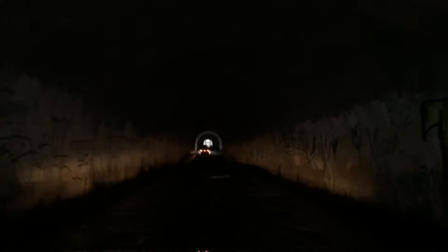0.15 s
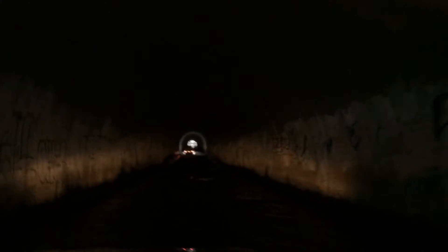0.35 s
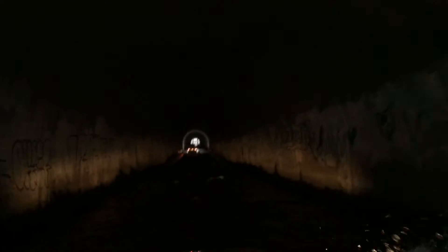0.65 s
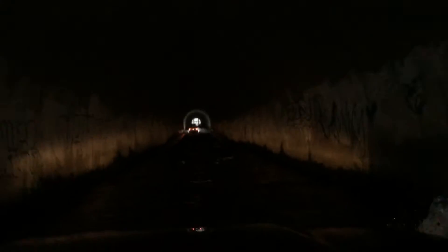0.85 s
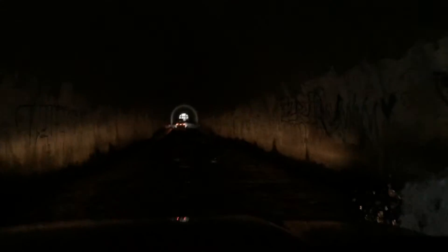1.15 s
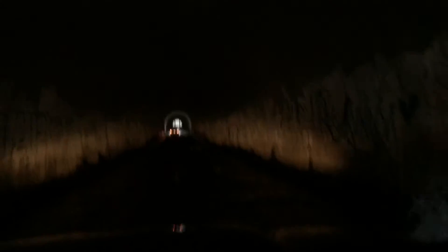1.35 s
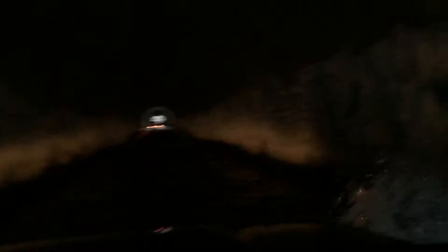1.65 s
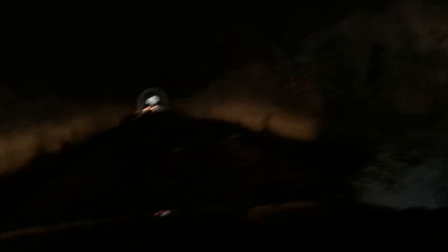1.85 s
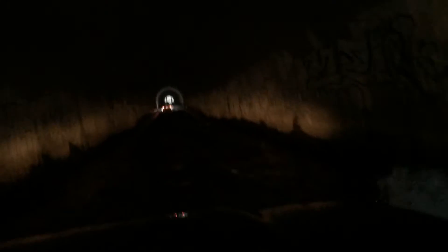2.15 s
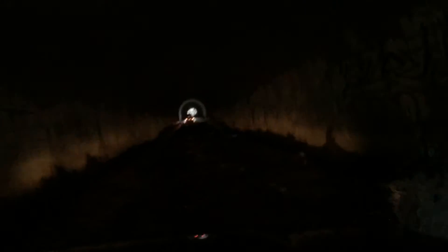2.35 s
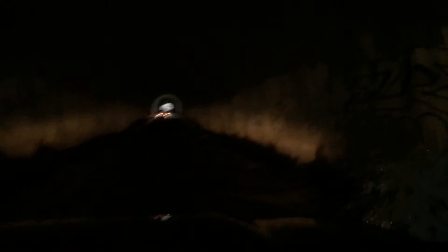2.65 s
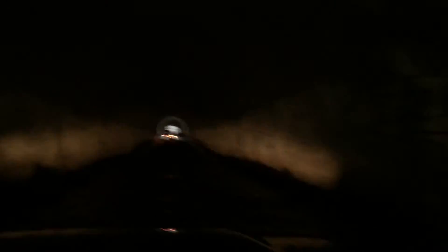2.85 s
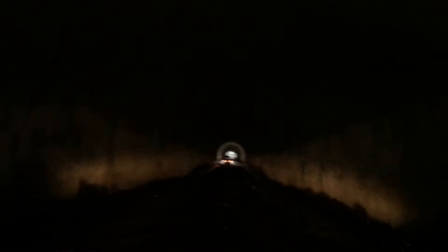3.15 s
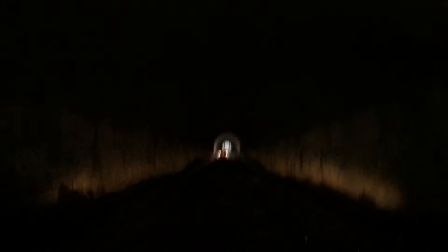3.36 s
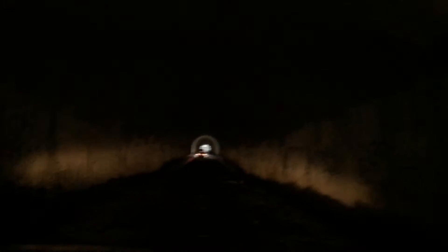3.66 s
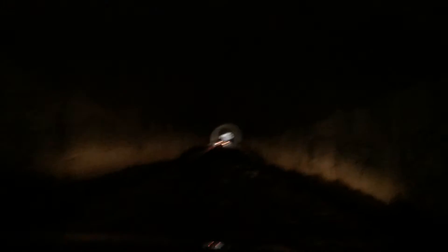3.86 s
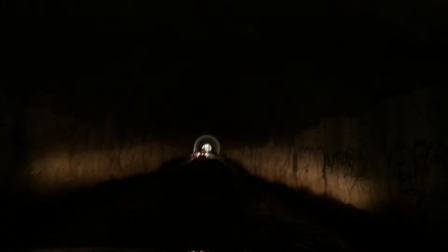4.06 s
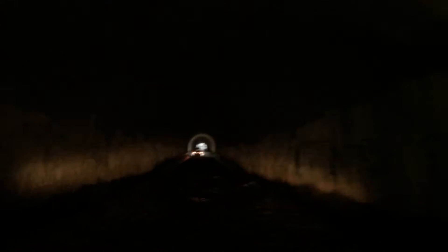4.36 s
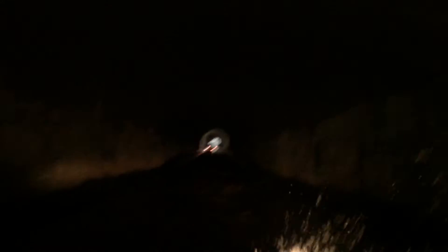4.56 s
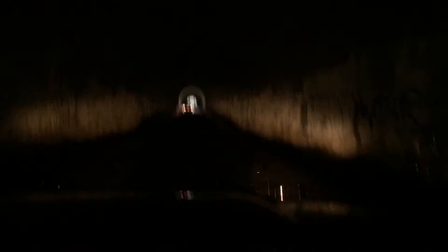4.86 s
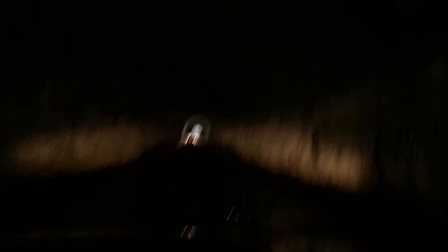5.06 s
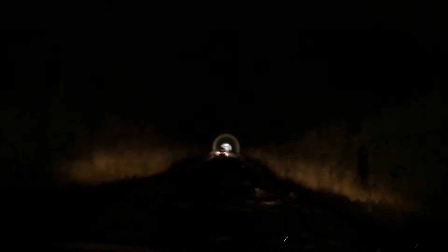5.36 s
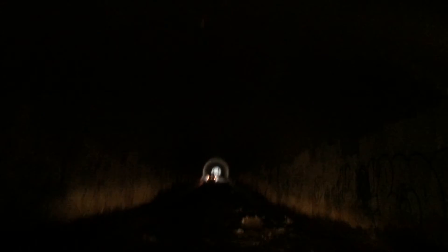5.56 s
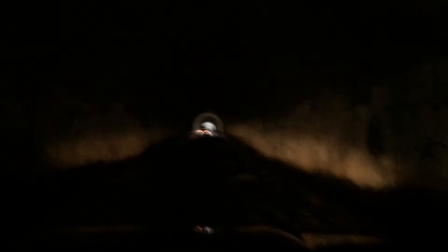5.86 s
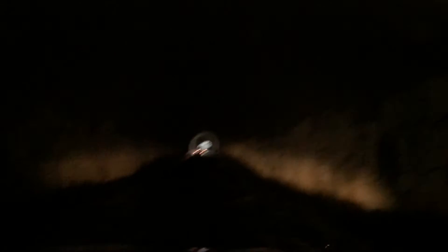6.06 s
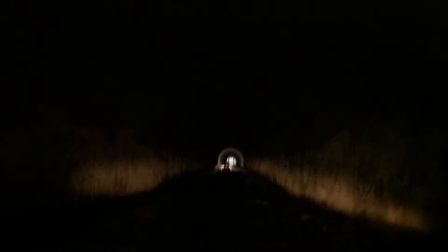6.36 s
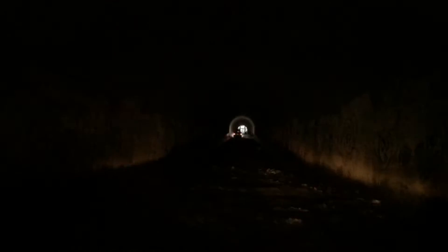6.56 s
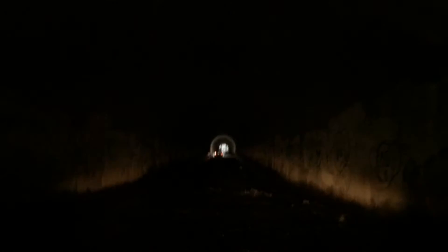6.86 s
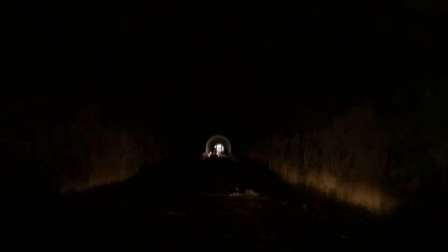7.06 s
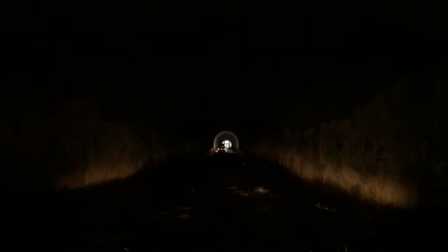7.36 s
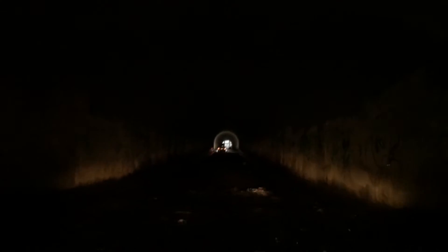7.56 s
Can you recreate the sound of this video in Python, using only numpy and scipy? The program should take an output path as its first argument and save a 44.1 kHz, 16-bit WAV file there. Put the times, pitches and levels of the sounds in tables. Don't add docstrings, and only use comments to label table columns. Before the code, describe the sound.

A low engine drone fills a car cabin with broad tyre rush on rough ground and a faint steady hum from a vehicle ahead in the tunnel. Low thumps come irregularly, with body panels droning. Around four seconds the revs dip and rise with tiny clicks of stones; later heavy bumps knock, one last stone rattles, more thuds follow and the treble fades.

```python
import sys
import numpy as np
from scipy import signal
from scipy.fft import rfft, irfft, next_fast_len
from scipy.io import wavfile
from scipy.ndimage import uniform_filter1d, minimum_filter1d, map_coordinates

SR = 44100
rng = np.random.default_rng(int(sys.argv[2]) if len(sys.argv) > 2 else 0)


def log_audio(samples):
    frames = np.atleast_2d(samples).T
    limited = np.clip(frames, -1, 1)
    pcm = np.round(limited * 32767).astype(np.int16)
    wavfile.write(sys.argv[1], SR, pcm)


def decibels_to_gain(level_db):
    exponent = np.asarray(level_db, float) / 20
    return 10 ** exponent


N = 340532
TIME_S = np.arange(N) / SR
STEP = 100

# time in seconds, level in dB.
TYRE_LEVEL = [(0, -33.5), (.7, -36.5), (.95, -35), (1.4, -36), (1.65, -34), (2.3, -32.5), (3.09, -32.5),
              (3.31, -36.5), (3.61, -34), (4.02, -35.5), (4.67, -31.5), (4.94, -35.5), (5.29, -34.5),
              (5.48, -31.5), (5.87, -34), (6.35, -31), (7.28, -30.5), (7.42, -34)]


def unit(x):
    return x / np.sqrt(np.mean(x ** 2) + 1e-20)


def curves(rows):
    s, *columns = np.transpose(rows)
    return [np.interp(TIME_S, s, column) for column in columns]


def wobble(rate_hz):
    knots = rng.standard_normal(int(N * rate_hz / SR) + 4)
    return map_coordinates(knots, [np.arange(N) * rate_hz / SR])


def fine(coarse):
    return np.interp(np.arange(N), np.arange(0, N, STEP), coarse)


def bells(rows):
    middle_s, length_s, value = np.transpose(rows)[..., None]
    coarse_s = np.arange(0, N, STEP) / SR
    return np.exp(-abs(2 * (coarse_s - middle_s) / length_s) ** 3), value


def lifted(rows, rest_db):
    bell, db = bells(rows)
    return fine(np.sqrt(decibels_to_gain(rest_db) ** 2 + np.sum((bell * decibels_to_gain(db)) ** 2, 0)))


def extra_db(rows):
    bell, db = bells(rows)
    return fine(np.sum(bell * db, 0))


def rush(spectrum, patchy_db):
    z = signal.stft(rng.standard_normal(N), nperseg=512)[2]
    patches = uniform_filter1d(rng.standard_normal(z.shape), size=8, axis=0)
    patches = unit(uniform_filter1d(patches, size=10, axis=1))
    x = signal.istft(z * decibels_to_gain(patchy_db * patches), nperseg=512)[1][:N]
    m = next_fast_len(N + 8192)
    hz, db = np.transpose(spectrum)
    log_hz = np.log(np.fft.rfftfreq(m, 1 / SR) + 1)
    gain = decibels_to_gain(np.interp(log_hz, np.log(hz + 1), db, -120, -120))
    return unit(irfft(rfft(x, m) * gain, m)[:N])


def tone(hz, drift_rad):
    phase = 2 * np.pi * np.cumsum(hz) / SR + drift_rad * wobble(12)
    return np.sqrt(2) * np.sin(phase + rng.uniform(0, 2 * np.pi))


def knocks(rows, rise_cycles):
    out, t = np.zeros(N + SR), np.arange(SR // 3) / SR
    for s, db, hz, t60_s in rows:
        decay = decibels_to_gain(db - 60 * t / t60_s)
        rise = 1 - np.exp(-(t * hz / rise_cycles) ** 2)
        out[round(s * SR):][:len(t)] += decay * rise * np.sin(2 * np.pi * hz * t)
    return out[:N]


def engine():
    # time in seconds, crank speed in Hz.
    crank_rows = [(0, 32.97), (.5, 33.54), (.75, 36.97), (1.3, 36.9), (1.8, 38), (2.2, 38.58), (3.0, 38.3),
                  (3.4, 36.46), (3.75, 34.9), (3.95, 36.3), (4.1, 41.86), (4.35, 44.1), (4.85, 45),
                  (5.6, 44.74), (6.1, 44.1), (7.1, 45), (7.72, 43.7)]
    # time in seconds, depth from 0 to 1.
    ripple_rows = [
        (0, 0.07),
        (.5, 0.4),
        (.9, 0.3),
        (1.45, 0.58),
        (1.6, 0.02),
        (7.72, .1),
    ]
    # middle in seconds, length in seconds, level in dB.
    second_rows = [(.08, 0.51, -13.5), (.57, 0.41, -13), (1.15, .72, -14), (1.9, 0.38, -16),
                   (2.3, 0.34, -21.5), (2.85, 0.48, -20.5), (3.24, .26, -11), (3.65, .34, -15.5),
                   (3.9, .26, -13), (4.17, 0.24, -22.5), (4.95, .6, -24), (5.55, .3, -26.5),
                   (6.8, 0.38, -31)]
    third_rows = [(.7, 0.21, -19), (1.15, 0.96, -22.5), (2.0, 0.13, -24), (2.55, 0.99, -24.5),
                  (3.25, 0.4, -28), (3.8, 0.5, -24), (4.35, 0.32, -20), (4.7, 0.26, -18.5),
                  (5.0, 0.52, -13.5), (5.6, 0.46, -22), (5.94, 0.082, -23), (6.5, 0.14, -26.5),
                  (7.6, 0.21, -23)]
    fourth_rows = [(.95, .9, -30), (1.9, 0.56, -30.5), (2.45, 0.65, -29.5), (4.12, 0.21, -26.5),
                   (4.45, .4, -29.5), (5.2, 0.88, -33), (7.65, .3, -29)]
    panel_rows = [(1.3, 0.21, -37.5), (1.9, 0.23, -34), (2.3, .6, -33.5), (2.66, 0.29, -29.5),
                  (2.97, 0.32, -31.5), (4.3, .4, -34), (4.9, 0.5, -29.5), (5.55, 0.55, -38),
                  (6.7, .15, -37)]
    crank_hz, = curves(crank_rows)
    ripple_depth, = curves(ripple_rows)
    load = 1 + ripple_depth * np.cos(2 * np.pi * 11.2 * (TIME_S - 1.25))
    second = lifted(second_rows, rest_db=-31) * tone(2 * crank_hz, drift_rad=0.17)
    third = lifted(third_rows, rest_db=-38) * tone(3 * crank_hz, drift_rad=0.23)
    firing = load * decibels_to_gain(0.6 * wobble(22)) * (second + third)

    waver_db = 1.3
    fourth_gain = lifted(fourth_rows, rest_db=-40) * decibels_to_gain(waver_db * wobble(7))
    fourth = fourth_gain * tone(4 * crank_hz, drift_rad=0.85)

    panel = np.zeros(N)
    for order in (5, 6):
        resonance = 1 / (1 + ((order * crank_hz - 228) / 16) ** 4)
        panel += resonance * tone(order * crank_hz, drift_rad=0.2)
    panel_gain = lifted(panel_rows, rest_db=-45) * decibels_to_gain(waver_db * wobble(7))
    return firing + fourth + panel_gain * panel


def body_boom():
    # middle in seconds, length in seconds, boom level in dB.
    rough_rows = [(.5, 0.28, -20), (1.0, 0.55, -24), (1.43, 0.092, -22), (2.85, 0.35, -26),
                  (3.2, 0.27, -18.5), (4.25, .3, -22), (4.62, .2, -26), (5.7, 0.29, -19), (6.25, 0.35, -34),
                  (7.34, 0.17, -20), (7.6, 0.25, -16)]
    # frequency in Hz, density in dB per Hz.
    boom_spectrum = [(25, -43), (40, -24), (55, -3.5), (64, -1), (71, 4.5), (80, -5.5), (95, -13.5),
                     (120, -3), (160, -49)]
    boom = unit(decibels_to_gain(0.82 * wobble(19)) * rush(boom_spectrum, patchy_db=0.1))
    return lifted(rough_rows, rest_db=-29.5) * boom


def bumps():
    # start in seconds, level in dB, ring in Hz, t60 in seconds.
    bump_rows = [(.455, -9, 71, 0.3), (.62, -11, 69, 0.1), (1.425, -10, 75.7, 0.083),
                 (1.96, -5, 79.8, 0.13), (2.36, -24, 75.1, .1), (2.79, -14, 80.6, 0.13),
                 (3.13, -3, 73.6, 0.12), (4.12, 0.5, 72.15, 0.13), (4.465, -13, 89.8, 0.11),
                 (5.525, -1.5, 76.4, .15), (5.75, 3, 70.6, 0.098), (5.95, 8, 77.2, 0.056),
                 (7.315, 4, 65.8, 0.14), (7.54, -3, 76.5, 0.2), (7.595, -1, 76.5, .2)]
    return knocks(bump_rows, rise_cycles=0.74)


def body_drone():
    # frequency in Hz, density in dB per Hz.
    drone_spectrum = [(70, -28), (105, -3), (123, -0.5), (140, 0.5), (170, -2), (200, -5), (250, -10.5),
                      (330, -18.5), (450, -35.5)]
    tyre_db, = curves(TYRE_LEVEL)
    follow_db = 0.4 * (tyre_db - tyre_db.mean())
    drone_db = -29.5 + follow_db + 1.18 * wobble(6)
    return decibels_to_gain(drone_db) * rush(drone_spectrum, patchy_db=0.95)


def tyres():
    # frequency in Hz, density in dB per Hz.
    roar_spectrum = [(150, -59), (250, -6.5), (370, -9), (425, -6), (570, -10), (700, -7.5), (820, -12),
                     (955, -9), (1150, -13.5), (1500, -19), (2400, -31.5), (5000, -70)]
    whoosh_spectrum = [(600, -32), (1200, -5), (1600, -2), (2100, -1.5), (2800, -5), (3800, -12),
                       (6000, -26), (10000, -70)]
    hiss_spectrum = [(1500, -30), (3000, -3), (4500, -2), (7000, -4.5), (10000, -7.5), (15000, -10.5),
                     (16000, -13)]
    # middle in seconds, length in seconds, extra hiss in dB.
    gravel_rows = [(.05, .15, 1.5), (1.9, 3.9, 0.5), (1.65, 0.33, 1.05), (2.27, 0.13, 2.5), (2.65, 0.33, 1),
                   (3.05, 0.16, 1.5), (4.3, 0.073, -1), (4.5, .2, -1), (4.68, .14, -0.5),
                   (3.95, 0.62, -1.2), (5.5, 0.22, 0), (5.95, .45, -1.5), (6.34, .12, 1), (6.55, .15, -1.5),
                   (6.8, 0.42, 1.5)]
    # middle in seconds, length in seconds, extra whoosh in dB.
    gust_rows = [
        (.12, .25, 1),
        (2.15, .6, -1.5),
        (3.62, .05, 2.5),
        (4.56, 0.14, -2.5),
        (4.72, 0.095, 1),
        (5.5, .3, -0.3),
        (6.0, .3, 1),
        (6.8, .5, 1.5),
        (7.3, .1, -1.5),
    ]
    tyre_db, = curves(TYRE_LEVEL)
    mean_db = tyre_db.mean()
    swing_db = tyre_db - mean_db
    gravel_db, gust_db = extra_db(gravel_rows), extra_db(gust_rows)
    soft_s = np.maximum(TIME_S - 7.04, 0)
    grit = wobble(35)

    roar_db = -3 + 1.14 * swing_db - 0.59 * gust_db
    roar_db += 0.27 * grit + 0.43 * wobble(9)
    whoosh_db = -5.5 + 1.05 * swing_db + gust_db + 0.35 * gravel_db - 2 * soft_s
    whoosh_db += 0.5 * grit + 0.5 * wobble(9)
    hiss_db = -7.5 + 0.94 * swing_db + gravel_db - 7.5 * soft_s
    hiss_db += 0.29 * grit + 0.25 * wobble(6.5)

    roar = decibels_to_gain(roar_db) * rush(roar_spectrum, patchy_db=0.73)
    whoosh = decibels_to_gain(whoosh_db) * rush(whoosh_spectrum, patchy_db=0.95)
    hiss = decibels_to_gain(hiss_db) * rush(hiss_spectrum, patchy_db=0.7)
    return decibels_to_gain(mean_db) * (roar + whoosh + hiss)


def tyre_note():
    # time in seconds, pitch in Hz, level in dB.
    slide_rows = [
        (0, 76, -80),
        (5.35, 71.5, -68),
        (5.5, 74.5, -33),
        (5.75, 72, -23),
        (6, 67.2, -37),
        (6.25, 67, -33),
        (6.45, 61.88, -58),
        (7.72, 61.98, -61),
    ]
    hz, db = curves(slide_rows)
    return decibels_to_gain(db) * tone(hz, drift_rad=0.37)


def stones():
    # start in seconds, level in dB, ring in Hz, t60 in seconds.
    stone_rows = [(3.618, -24, 2410, 0.02), (3.623, -23, 1960, 0.016), (3.634, -31, 1697, 0.018),
                  (4.302, -41, 13450, .06), (4.302, -42, 10040, 0.093), (4.325, -45, 13450, .08),
                  (6.336, -51, 9500, 0.0055), (6.351, -27, 11000, 0.0051), (6.375, -43, 11000, 0.016),
                  (6.918, -18, 2200, .015), (6.922, -24, 1676, 0.019), (6.932, -21, 2100, 0.017),
                  (6.95, -24, 750, 0.035)]
    return knocks(stone_rows, rise_cycles=1.3)


def vehicle_ahead():
    # time in seconds, hum in Hz.
    hum_rows = [(0, 142.4), (1.5, 141.1), (2.0, 137.8), (3.8, 136.3), (4.3, 142.2), (5.9, 144.3),
                (7.0, 144.4), (7.5, 151.3), (7.72, 154)]
    # middle in seconds, length in seconds, level in dB.
    lift_rows = [(.05, 0.32, -25.5), (1.1, .3, -32), (1.75, 0.5, -28), (3.05, 1.12, -28.5),
                 (4.8, 0.34, -43), (6.15, 0.95, -29), (6.85, 0.22, -26.5), (7.3, 0.27, -26.5)]
    hz, = curves(hum_rows)
    gain = lifted(lift_rows, rest_db=-34) * decibels_to_gain(1.5 * wobble(5))
    return gain * tone(hz, drift_rad=0.52)


def tunnel_pressure():
    # frequency in Hz, density in dB per Hz.
    pressure_spectrum = [(1, -8), (15, -10), (30, 9), (42, 3), (55, -21), (70, -16)]
    return decibels_to_gain(-40.5) * rush(pressure_spectrum, patchy_db=-2.0)


def scene():
    car = engine() + body_boom() + bumps() + body_drone()
    road = tyres() + tyre_note() + stones()
    return (car + road + vehicle_ahead() + tunnel_pressure())[None]


def roll_off(x):
    return signal.sosfilt(signal.butter(12, 15330, fs=SR, output="sos"), x)


def record(dry):
    need = np.minimum(1, 0.66 / (abs(dry) + 1e-9))
    held = minimum_filter1d(need, size=1800)
    gain = uniform_filter1d(held, size=900)
    return roll_off(dry * gain)


dry = scene()
out = record(dry)
log_audio(out)
```